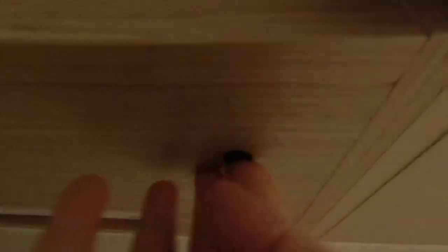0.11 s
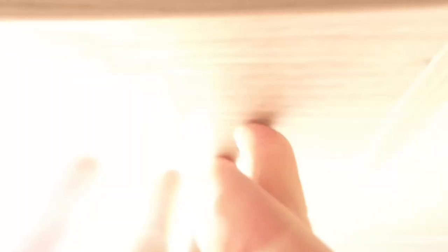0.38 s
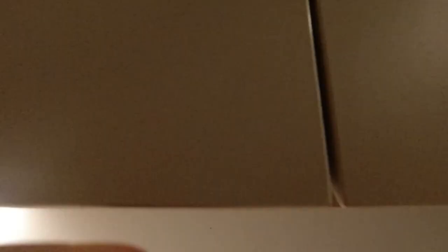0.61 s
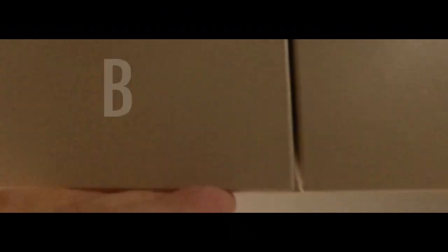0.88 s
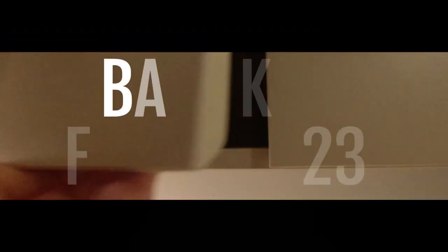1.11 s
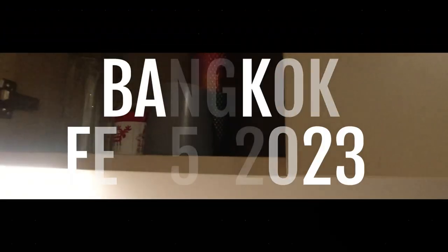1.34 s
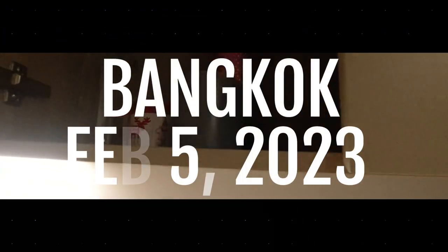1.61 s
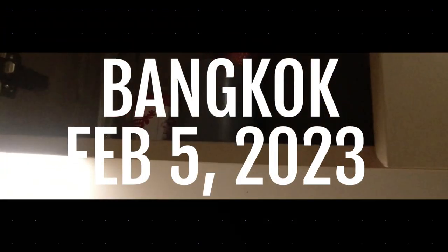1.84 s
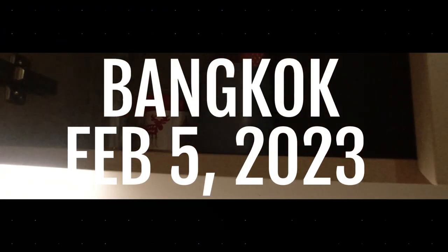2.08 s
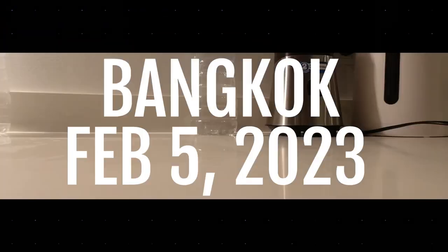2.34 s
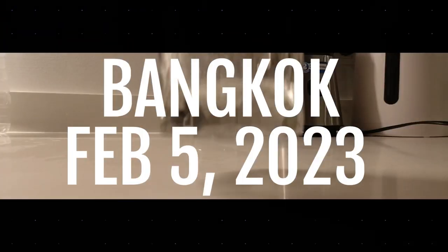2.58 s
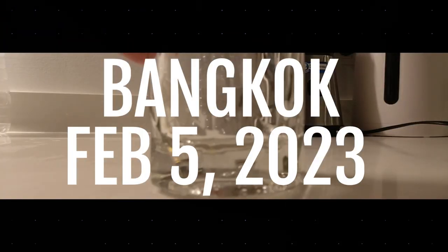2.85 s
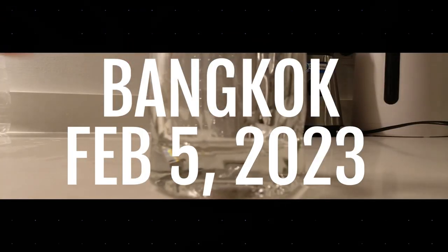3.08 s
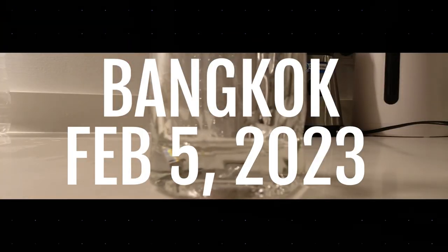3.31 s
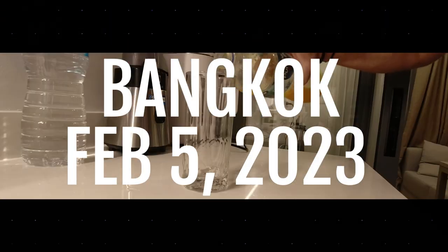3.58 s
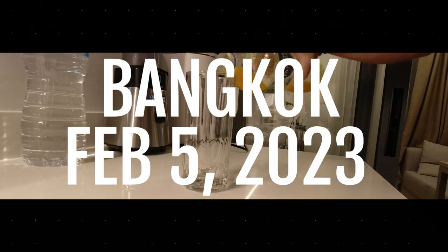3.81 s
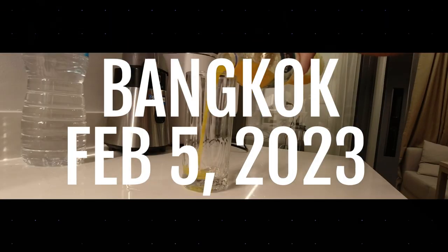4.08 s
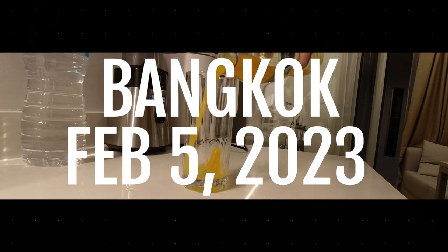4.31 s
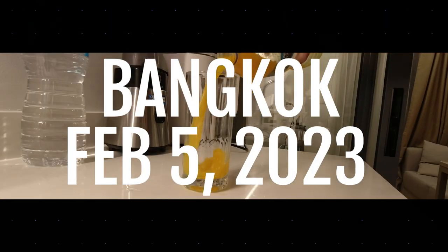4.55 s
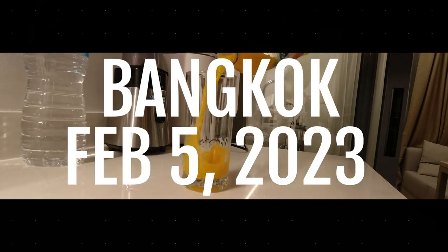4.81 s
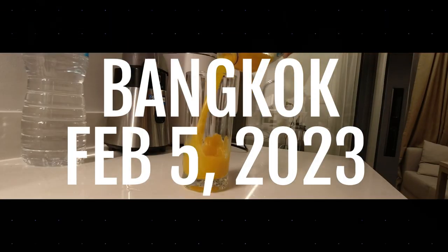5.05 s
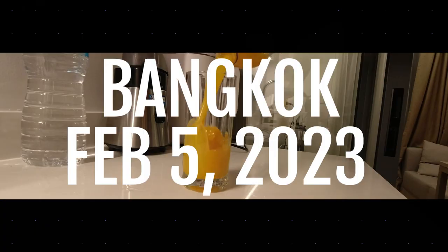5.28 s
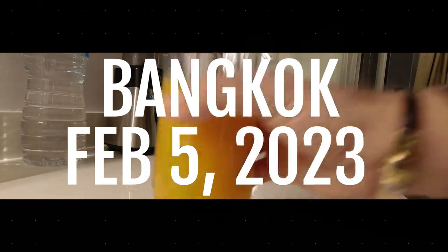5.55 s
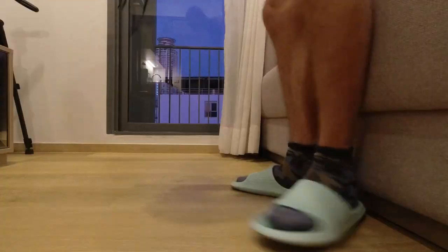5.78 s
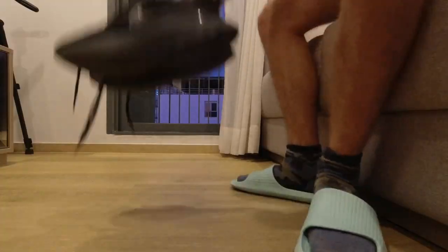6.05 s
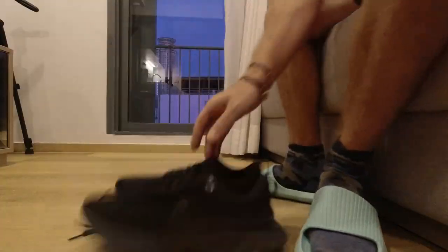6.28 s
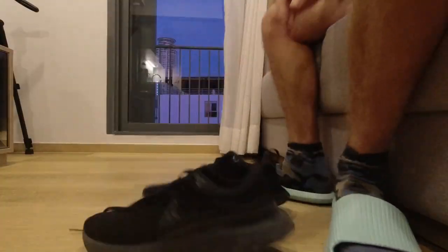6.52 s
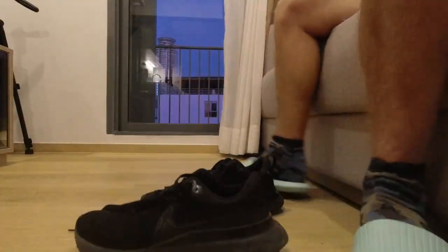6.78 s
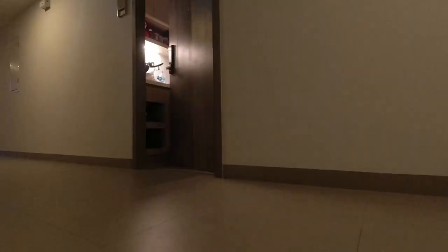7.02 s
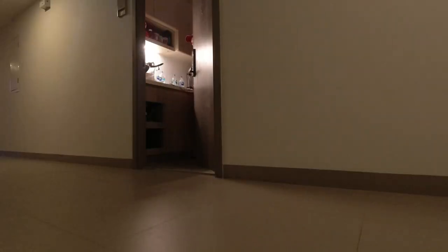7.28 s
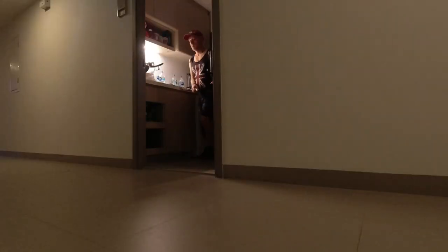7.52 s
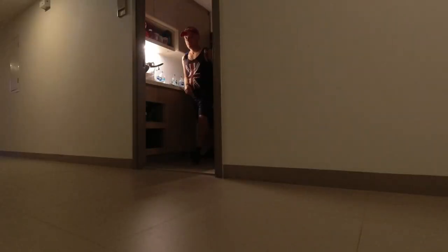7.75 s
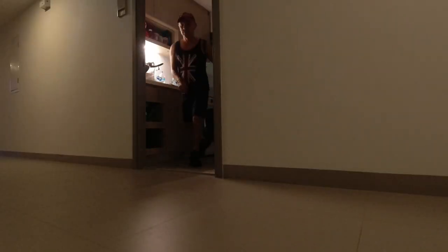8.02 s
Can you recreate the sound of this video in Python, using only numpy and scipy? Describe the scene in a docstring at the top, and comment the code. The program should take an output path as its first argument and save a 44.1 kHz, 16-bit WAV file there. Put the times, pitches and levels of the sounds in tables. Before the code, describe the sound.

Quick indoor cuts: small clicks, cabinet thumps, a sharp glass set-down, bubbly pouring, shoes dropping and slippers slapping, a soft door whoosh.

```python
"""Kitchen and hallway in six parts

Six parts butt-joined: a lamp switch, a cabinet drawer, a glass set on a stone counter, juice glugging into it,
shoes dropped on a wooden floor, a hall door swinging. Blows ring clusters of modes, rubbing is rough noise,
bubbles are short rising tones; small hard rooms echo them over noise air, low rumble and humming tones."""
import sys
import numpy as np
from scipy import signal
from scipy.fft import rfft, irfft
from scipy.io import wavfile
from scipy.ndimage import uniform_filter1d

SR = 44100
rng = np.random.default_rng(int(sys.argv[2]) if len(sys.argv) > 2 else 0)


def how_loud(loudness_db):
    """Turn decibels into a plain amplitude multiplier (0 dB gives 1, 20 dB gives 10)."""
    steps = np.asarray(loudness_db, float) / 20
    return 10 ** steps


def wav_out(sig):
    """Save sig, one row per channel (or a flat mono array), as 16-bit PCM at SR to the path in sys.argv[1]."""
    wavfile.write(sys.argv[1], SR, np.round(np.clip(np.atleast_2d(sig).T, -1, 1) * 32767).astype(np.int16))


N = 358533
T = np.arange(N) / SR
UP_DOWN = np.array([[1], [-1]])  # side signal into left, right

# parts: (start [s], air [dB], rumble [dB], hum [dB], echo gain [dB])
PARTS = [(0, -59.5, -53, -69, -5.5), (0.646, -51, -53, -63, -1.5), (2.381, -61.5, -68.5, -69.5, -4),
         (3.552, -53, -49.5, -60, -2.5), (5.651, -39.5, -49.5, -72, -4), (6.919, -41.5, -42.5, -87, -11)]
# stereo width: (frequency [Hz], side minus mid [dB])
WIDTH = [(60, -20.5), (500, -16.5), (1300, -6.5), (4400, 2.5), (15000, -1.5)]


def colour(x, tone):
    """Filter by (frequency [Hz], gain [dB]) points, interpolated on log frequency."""
    hz, db = np.transpose(tone)
    f = np.fft.rfftfreq(x.shape[-1], 1 / SR) + 1
    return irfft(rfft(x) * how_loud(np.interp(np.log(f), np.log(hz), db)), x.shape[-1])


def unit(x):
    """Scale to rms 1."""
    return x / np.sqrt(np.mean(x ** 2))


def peak(x, db):
    """Scale to a peak level."""
    return x * how_loud(db) / np.abs(x).max()


def wide(tone, length):
    """Stereo noise of rms 1: mid plus and minus an independent side."""
    mid, side = colour(rng.standard_normal((2, length)), tone)
    return unit(mid + UP_DOWN * colour(side, WIDTH))


def walk(rate_hz):
    """Random levels of rms 1, rate_hz per second, joined by ramps."""
    hold = int(SR / rate_hz)
    levels = rng.standard_normal(N // hold + 1)
    return unit(uniform_filter1d(np.repeat(levels, hold), hold)[:N])


def gate(table, column=1):
    """Gain along a dB curve, silent outside it."""
    rows = np.array(table)
    return how_loud(np.interp(T, rows[:, 0], rows[:, column], left=-200, right=-200))


def part_of(t):
    """Index of the part that plays at time t."""
    return np.searchsorted([row[0] for row in PARTS], t, side="right") - 1


def strokes(rows, rise_db_s, fall_db_s):
    """Gain of strokes that swell, hold and fade at fixed dB rates, each within its own part."""
    part, gain = part_of(T), 0
    for s, held, db in rows:
        rise = rise_db_s * np.clip(s - T, 0, 1)
        fall = fall_db_s * np.clip(T - s - held, 0, 1)
        gain = gain + (part == part_of(s)) * how_loud(db - rise - fall)
    return gain


def add(out, s, x):
    """Mix x in at time s."""
    i = int(s * SR)
    out[i:i + len(x)] += x[:N - i]


def rub(gain, tone, rate_hz, rough_db):
    """Friction: noise whose grip wanders rate_hz times a second, by rough_db rms."""
    rough = rng.standard_normal(N) * how_loud(rough_db * walk(rate_hz))
    return gain * unit(colour(rough, tone))


def room_air(air_db):
    """Broadband room noise, its level wavering."""
    # (frequency [Hz], relative density [dB])
    air_tone = [(53, -38.5), (90, -0.5), (307, -10), (667, -16), (883, -22), (1840, -27.5), (15500, -64.5)]
    return how_loud(air_db + 0.96 * walk(11)) * wide(air_tone, N)


def bass_rumble(rumble_db):
    """Slowly wavering noise, mostly near 30 Hz."""
    return how_loud(rumble_db + 1.0 * walk(4)) * wide([(15, -9.0), (30, 8.5), (130, -5.5), (250, -60.5)], N)


def air_hum(hum_db):
    """Steady sines, each wavering in level."""
    # (frequency [Hz], relative level [dB])
    partials = [(301, -63), (667, -67), (1803, -73.5)]
    hum = sum(how_loud(db + 0.85 * walk(34)) * np.sin(2 * np.pi * hz * T) for hz, db in partials)
    return how_loud(hum_db) * unit(hum)


def low_throb():
    """A low sine gliding in pitch and level."""
    # (time [s], frequency [Hz], rms level [dB])
    curve = [(3.548, 33.54, -35), (3.95, 38.5, -39.5), (4.1, 37.8, -69)]
    hz = np.interp(T, *np.transpose(curve)[:2])
    return np.sqrt(2) * gate(curve, column=2) * np.cos(2 * np.pi * np.cumsum(hz) / SR)


def faint_whine():
    """A faint high whine: one sine with a flickering level."""
    # (time [s], level [dB])
    curve = [(0.643, -69.5), (1.04, -69), (1.061, -82.5), (4.451, -80.5)]
    return np.sqrt(2) * gate(curve) * how_loud(walk(28)) * np.sin(2 * np.pi * 2134 * T)


def door_swing():
    """The door swings: dull stereo noise of wavering level."""
    # (time [s], level [dB])
    curve = [(6.88, -36.5), (6.96, -32), (7.2, -39), (7.45, -55), (8.13, -62)]
    # (frequency [Hz], gain [dB])
    door_tone = [(30, -6), (140, -17), (500, -27.5), (720, -18), (950, -28), (1350, -26.5), (4000, -42.5),
                 (7000, -73.5)]
    return gate(curve) * how_loud(1.5 + 1.95 * walk(12)) * wide(door_tone, N)


def cloth_rustle():
    """Cloth: strokes of bright stereo noise."""
    # (full from [s], held [s], level [dB])
    rows = [(2.488, 0.015, -46), (5.66, 0.12, -31), (5.91, 0.0014, -36), (6.012, 0.0034, -38.5),
            (6.32, 0.15, -44), (6.57, 0.024, -30.5), (6.8, 0.36, -36)]
    # (frequency [Hz], gain [dB])
    cloth_tone = [(200, -13), (700, 3), (3000, 6), (5500, 1), (9000, 3), (15800, 1.5)]
    return strokes(rows, rise_db_s=352, fall_db_s=285) * how_loud(walk(47)) * wide(cloth_tone, N)


def cabinet_shudder():
    """The cabinet shudders under the hand: rough bass noise."""
    # (time [s], level [dB])
    curve = [(.76, -58.5), (.85, -33), (1.2, -41.5), (1.4, -32.5), (1.62, -45.5), (1.85, -32.5),
             (2.2, -38.5), (2.38, -62)]
    # (frequency [Hz], gain [dB])
    shake_tone = [(60, 19), (140, 12.5), (400, -71.5)]
    return rub(gate(curve), shake_tone, rate_hz=25, rough_db=6.5)


def dull_slides():
    """Dull friction as the drawer runs out and the full glass leaves the counter."""
    # (full from [s], held [s], level [dB])
    rows = [(1.305, 0.081, -29.5), (5.39, 0.041, -33), (5.435, 0.088, -28)]
    # (frequency [Hz], gain [dB])
    drag_tone = [(100, -35), (300, -8.5), (457, -2), (650, -12), (1120, -7), (2800, -34.5), (6000, -67.5)]
    return rub(strokes(rows, rise_db_s=902, fall_db_s=516), drag_tone, rate_hz=200, rough_db=2.5)


def high_hiss():
    """One short narrow-band hiss near 9 kHz as the drawer scrapes, coloured by a microphone resonance."""
    # (full from [s], held [s], level [dB])
    rows = [(1.378, 0.0061, -46.5)]
    tone = [(7000, -23.0), (9300, -1.5), (11000, -25.5)]
    return rub(strokes(rows, rise_db_s=723, fall_db_s=416), tone, rate_hz=270, rough_db=2.2)


def drawer_rub():
    """Drawer friction: rough mid-band strokes."""
    # (full from [s], held [s], level [dB])
    rows = [(1.046, 0.0066, -45), (1.112, 0.044, -46), (1.378, 0.011, -30), (1.755, 0.064, -48),
            (1.972, 0.016, -44)]
    # (frequency [Hz], gain [dB])
    drawer_tone = [(300, -15.5), (850, -0.5), (1180, 0), (1500, 0), (2150, -2), (2500, -11.5),
                   (4300, -10.5), (6500, -46)]
    return rub(strokes(rows, rise_db_s=996, fall_db_s=424), drawer_tone, rate_hz=120, rough_db=5.04)


def bubble(hz, length_s, glide):
    """A tone that swells, then closes off, rising from hz as the bubble nears the surface."""
    t = T[:int(length_s * SR)]
    swell = np.sin(np.pi * (t / length_s) ** 0.57) ** 2
    return np.sin(2 * np.pi * hz * t * (1 + glide * t / length_s)) * swell


def bottle_glugs():
    """Glugs at the bottle neck: big bubbles, each with a noise splash."""
    # (time [s], level before filter [dB], starting pitch [Hz])
    big_bubbles = [(4.446, -42.5, 3930), (4.505, -25, 1738), (4.6, -25.5, 1814), (4.632, -29, 3010),
                   (4.669, -29, 2963), (4.678, -25.5, 1790), (4.779, -23.5, 1784), (4.828, -18, 1249),
                   (4.868, -27.5, 1554), (4.912, -8.5, 675), (4.925, -19.5, 703), (4.938, -14.5, 678),
                   (4.953, -22.5, 1290), (4.975, -19, 1850), (5.008, -36.5, 3320), (5.073, -28, 850),
                   (5.08, -33, 3530), (5.099, -25, 767), (5.136, -25.5, 746), (5.215, -17.5, 762),
                   (5.256, -18.5, 766), (5.283, -28.5, 2220), (5.294, -6.5, 720), (5.296, -22.5, 1485),
                   (5.308, -16.5, 830)]
    glugs = np.zeros(N)
    for (s, db, hz), glide in zip(big_bubbles, rng.random(len(big_bubbles))):
        add(glugs, s, how_loud(db) * bubble(hz, 0.015, 0.034 * glide))
        add(glugs, s, how_loud(db - 19) * rng.standard_normal(800) * np.exp(-T[:800] / 0.032))
    return colour(glugs, [(300, -12.0), (600, -3.5), (4000, -3), (7000, -48.5)])


def glass_fill():
    """Overlapping small bubbles and wet hiss in the glass."""
    # (time [s], small-bubble level [dB])
    curve = [(4.43, -74), (4.681, -45), (4.8, -66), (4.953, -49), (5.179, -47), (5.298, -42.5), (5.39, -69)]
    # pitches that the air in glass and bottle favours [Hz]
    fill_hz = [1790, 2675, 3040, 3810, 5840]
    fizz = np.zeros(N)
    start, span = curve[0][0], curve[-1][0] - curve[0][0]
    for when, which, size, glide in rng.random((900, 4)):
        hz = fill_hz[int(which * len(fill_hz))] * (1 + 0.3 * (glide - .5) ** 3 * 4)
        size_db = -3.5 * np.log(size) - 7 * np.log2(hz / 1000)
        add(fizz, start + when * span, how_loud(size_db) * bubble(hz, 0.005 + 0.0085 * glide, 0.06 * size))
    fizz = unit(fizz) * np.sqrt(span * SR / N)
    hiss = rub(how_loud(-7), [(700, -8), (1500, 0), (4000, -8), (6500, -30)], rate_hz=90, rough_db=3.5)
    return gate(curve) * how_loud(4.6 * walk(60)) * (fizz + hiss)


def fine_spray():
    """Short bursts of high hiss."""
    # (full from [s], held [s], level [dB])
    rows = [(4.4725, 0.0018, -53.5), (4.6667, 0.013, -44.5), (4.7633, 0.0025, -55), (5.2155, 0.0033, -53)]
    tone = [(8200, -7.0), (9300, 15.5), (11500, -35.0)]
    return rub(strokes(rows, rise_db_s=3000, fall_db_s=382.5), tone, rate_hz=130, rough_db=3.0)


def glass_rim():
    """Clear decaying tones with a brief swell; the lowest two beat, a harder tap favours the high ones."""
    # (time [s], level [dB], hardness [dB/octave])
    taps = [(2.84, -46, 0), (3.09, -44, -8.5)]
    # (frequency [Hz], relative level [dB], t60 [s])
    rim_modes = [(2713, -2, .36), (2756, -1, .38), (5945, 1, .14), (10250, -1, .15)]
    out, t = np.zeros(N), T[:SR // 2]
    hz, mode_db, t60_s = np.transpose(rim_modes)[:, :, None]
    fade = (1 - np.exp(-t / 0.0021)) * np.exp(-np.log(1000) * t / t60_s)
    ring = fade * np.sin(2 * np.pi * hz * t)
    for s, db, hardness in taps:
        tap_db = db + mode_db + hardness * np.log2(hz / hz[0])
        add(out, s, np.sum(how_loud(tap_db) * ring, axis=0))
    return out


def blows(events, modes, push_ms, crack_ms, crack_tone, scatter_db):
    """Each mode is a dense cluster: members start in step as a knock, then a noisy tail; a crack marks contact."""
    out, t = np.zeros(N), T[:2 ** 14]
    hz, db, t60_s, spread = np.transpose(modes)[:, :, None]
    f = np.fft.rfftfreq(len(t), 1 / SR) + 1e-9
    cluster = np.exp(-.5 * (np.log(f / hz) * 100 / spread) ** 2)
    knock = irfft(-1j * cluster)
    knock /= np.abs(knock).max(axis=1, keepdims=True)
    push = (1 - np.exp(-t * 2000 / push_ms)) ** 2
    fade = how_loud(db) * np.exp(-np.log(1000) * t / t60_s) * push
    crack_fade = np.exp(-t * 1000 / crack_ms) * (1 - np.exp(-t * 6000 / crack_ms)) ** 2
    low = hz[:, 0] < 250  # boom modes; the rest knock
    for s, knock_db, boom_db, crack_db in events:
        tail = irfft(cluster * rfft(rng.standard_normal((len(modes), len(t)))))
        tail *= how_loud(scatter_db) / tail.std(axis=1, keepdims=True)
        ring = fade * how_loud(3.5 * rng.standard_normal((len(modes), 1))) * (knock + tail)
        crack = colour(rng.standard_normal(len(t)), crack_tone) * crack_fade
        add(out, s, peak(ring[~low].sum(axis=0), knock_db))
        add(out, s, peak(ring[low].sum(axis=0), boom_db))
        add(out, s, peak(crack, crack_db))
    return out


def lamp_switch():
    """Switch clicks: short modes, little scatter."""
    # (time [s], knock peak [dB], boom peak [dB], crack peak [dB])
    events = [(0.027, -36.5, -52.5, -77), (0.352, -37, -52.5, -56), (0.397, -24, -31, -18.5),
              (0.408, -20, -24, -50), (0.581, -35.5, -67, -67)]
    # (frequency [Hz], relative level [dB], t60 [s], cluster spread [%])
    modes = [(58.1, -5, 0.11, 180), (445, 0, 0.093, 2.1), (920, 7, 0.11, 12), (1723, -5, 0.044, 27)]
    # (frequency [Hz], gain [dB])
    crack_tone = [(800, -11.5), (2800, -2.5), (9000, -1), (14000, -17.5)]
    return blows(events, modes, push_ms=1.0, crack_ms=2.5, crack_tone=crack_tone, scatter_db=-18.0)


def cabinet_knocks():
    """Cabinet and drawer knocks: soft push, strongly scattered modes."""
    # (time [s], knock peak [dB], boom peak [dB], crack peak [dB])
    events = [(.811, -31.5, -32.5, -57), (1.046, -43, -45.5, -30), (1.14, -35, -28, -63),
              (1.376, -26, -28, -24.5), (1.389, -22, -23, -14), (1.745, -18, -20, -40.5),
              (1.756, -13, -16, -44.5), (1.772, -16.5, -10.5, -50), (1.818, -29.5, -8.5, -51.5),
              (2.102, -33.5, -31.5, -45), (2.132, -25, -16, -71.5), (2.425, -34.5, -44, -50)]
    # (frequency [Hz], relative level [dB], t60 [s], cluster spread [%])
    modes = [(57.5, -7, 0.19, 19), (97, 3.5, 0.22, 16), (180, -7, 0.2, 27), (298, 4, 0.128, 14),
             (530, 3, 0.09, 19), (910, -4.5, 0.075, 38.6)]
    # (frequency [Hz], gain [dB])
    crack_tone = [(700, -14.5), (1500, 2), (3500, -7), (7000, -31)]
    return blows(events, modes, push_ms=6.4, crack_ms=7.7, crack_tone=crack_tone, scatter_db=-5.5)


def shoe_drops():
    """Shoes on the wooden floor: floor modes, hard push."""
    # (time [s], knock peak [dB], boom peak [dB], crack peak [dB])
    events = [(5.777, -23.5, -31.5, -35), (5.813, -17, -1.5, -40.5), (5.852, -32, -7.5, -44),
              (6.216, -26.5, -24, -68.5), (6.306, -24, -26, -20.5), (6.319, -20, -44.5, -18.5),
              (6.361, -15, -22.5, -15), (6.4035, -14, -31, -10.5), (6.4245, -9, -12.5, -17.5),
              (6.434, -12, -11.5, -19)]
    # (frequency [Hz], relative level [dB], t60 [s], cluster spread [%])
    modes = [(67, -16, 0.13, 10), (136.4, -11.5, 0.55, 1.8), (192, -11.5, 0.35, 7), (292, 5, 0.04, 30),
             (726, 6, 0.079, 30), (1252, -6, 0.06, 34), (1995, -7, 0.25, 38)]
    # (frequency [Hz], gain [dB])
    crack_tone = [(500, -5.5), (2500, -1.5), (9000, -0.5), (15000, -21.5)]
    return blows(events, modes, push_ms=0.6, crack_ms=1.0, crack_tone=crack_tone, scatter_db=-7.0)


def slipper_slaps():
    """Slipper slaps: broad, mostly short modes."""
    # (time [s], knock peak [dB], boom peak [dB], crack peak [dB])
    events = [(6.639, -24, -44, -27.5), (6.645, -12, -36, -24.5), (6.7015, -13, -36.5, -16.5),
              (6.7675, -8, -26.5, -14), (6.799, -19, -19.5, -23.5)]
    # (frequency [Hz], relative level [dB], t60 [s], cluster spread [%])
    modes = [(207, 0, 0.24, 16), (328, 3.5, 0.026, 22), (830, 2, 0.027, 38), (1450, -8, 0.03, 25)]
    # (frequency [Hz], gain [dB])
    crack_tone = [(1000, -6.5), (2350, 0.5), (3800, -3), (5000, -27)]
    return blows(events, modes, push_ms=0.68, crack_ms=2.2, crack_tone=crack_tone, scatter_db=-7.5)


def glass_set_down():
    """Glass on stone: hard push, very short crack."""
    # (time [s], knock peak [dB], boom peak [dB], crack peak [dB])
    events = [(2.8392, -3, -25.5, 0.5), (2.866, -8.5, -41, -34.5), (2.884, -14.5, -39, -41),
              (3.035, -15, -33.5, -39), (3.064, -15, -50.5, -41), (3.089, -10.5, -32, -22.5)]
    # (frequency [Hz], relative level [dB], t60 [s], cluster spread [%])
    modes = [(92.5, 0, 0.23, 23), (410, -2.5, 0.25, 14), (613.5, 2, 0.2, 4), (726, 1.5, .2, 6),
             (890, -2, 0.2, 5.6), (1054, 0.5, .12, 6.8), (1325, 0, 0.12, 7), (1778, -1.5, 0.19, 7),
             (2200, 5, 0.024, 9.9)]
    # (frequency [Hz], gain [dB])
    crack_tone = [(400, -12), (2200, 4), (3500, -13.5), (9000, -36.5)]
    return blows(events, modes, push_ms=0.6, crack_ms=0.88, crack_tone=crack_tone, scatter_db=-12.0)


def echo(t60_s):
    """Hard walls: impulse response of dense decaying stereo noise, unit energy."""
    t = T[:SR // 2]
    low = wide([(60, -8.0), (1500, -6.5), (4000, -17.0)], len(t))
    high = wide([(800, -28), (2500, -10.5), (15000, -14.0)], len(t))
    fade = np.exp(-np.log(1000) * t / t60_s) * (1 - np.exp(-t / 0.000087))
    return unit((low + 2 * high) * fade) / np.sqrt(len(t))


def room_echo(dry, echo_db):
    """Each part has its own echo gain; its echo stops where the next part starts."""
    part, walls, wet = part_of(T), echo(t60_s=0.29), 0
    for k, db in enumerate(echo_db):
        here = part == k
        wet = wet + how_loud(db) * signal.fftconvolve([dry * here], walls, axes=1)[:, :N] * here
    return wet


def two_ports(dry):
    """Sound from one side reaches two ports slightly apart: a quadrature side signal, wider in the treble."""
    return dry + UP_DOWN * how_loud(-4.0) * signal.hilbert(colour(dry, WIDTH)).imag


def scene():
    """Direct sounds and their echo over each part's own background."""
    _, air_db, rumble_db, hum_db, echo_db = np.transpose(PARTS)
    part = part_of(T)
    background = room_air(air_db[part]) + bass_rumble(rumble_db[part]) + air_hum(hum_db[part])
    background = background + low_throb() + faint_whine() + door_swing() + cloth_rustle()
    dry = cabinet_shudder() + dull_slides() + high_hiss() + drawer_rub()
    dry += bottle_glugs() + glass_fill() + fine_spray() + glass_rim()
    dry += lamp_switch() + cabinet_knocks() + shoe_drops() + slipper_slaps() + glass_set_down()
    return two_ports(dry) + room_echo(dry, echo_db) + background


def low_pass(x):
    """Removes everything above the highest recorded frequency."""
    return signal.sosfilt(signal.butter(12, 16020, fs=SR, output="sos"), x)


def record(dry):
    """Hard clip at full scale."""
    mix = np.clip(dry, -1, 1)
    return low_pass(mix)


dry = scene()
out = record(dry)
wav_out(out)
```